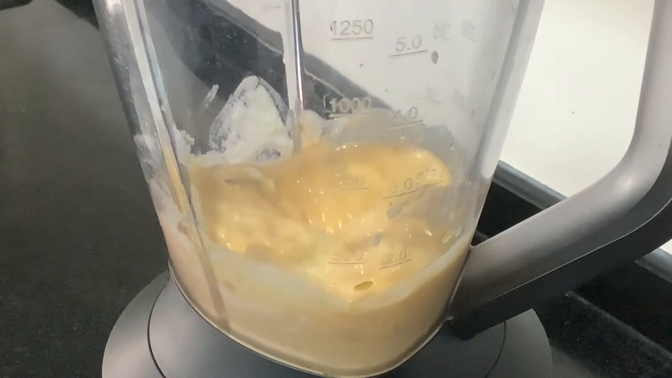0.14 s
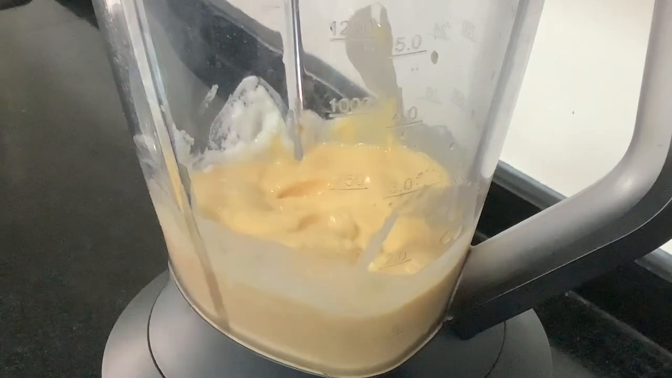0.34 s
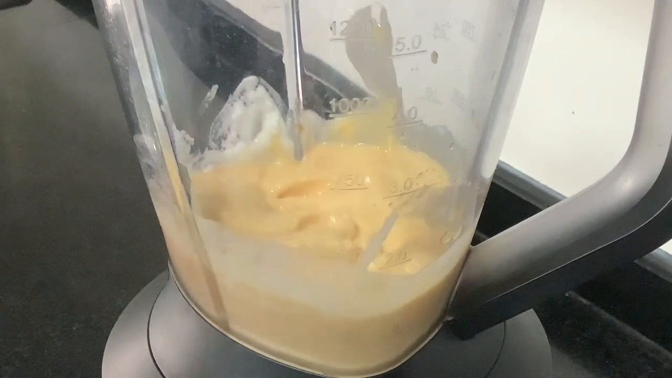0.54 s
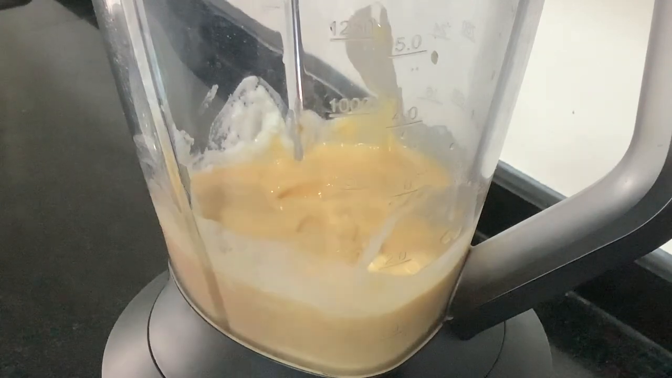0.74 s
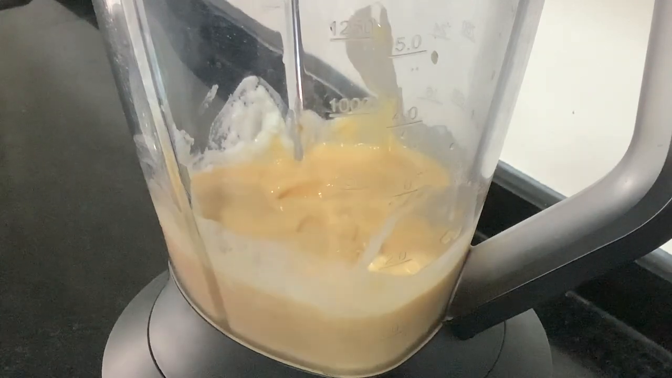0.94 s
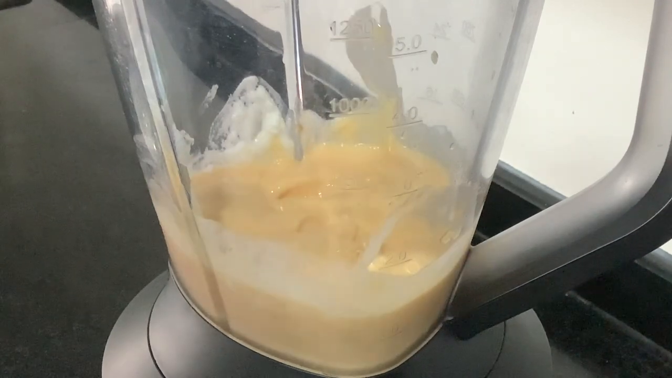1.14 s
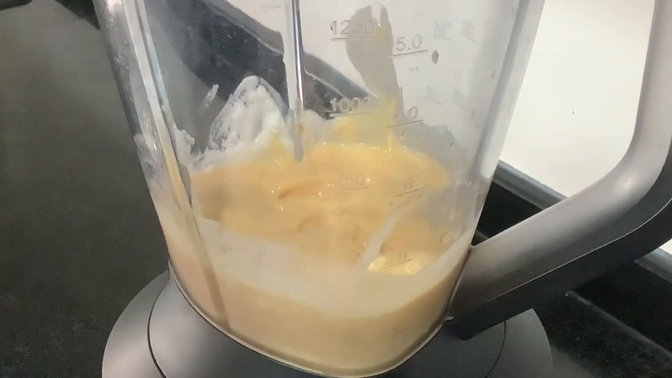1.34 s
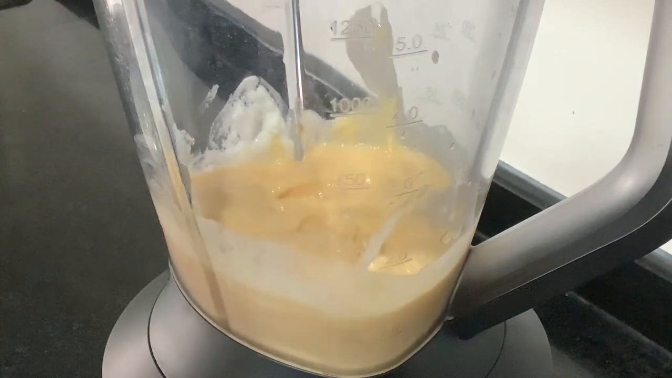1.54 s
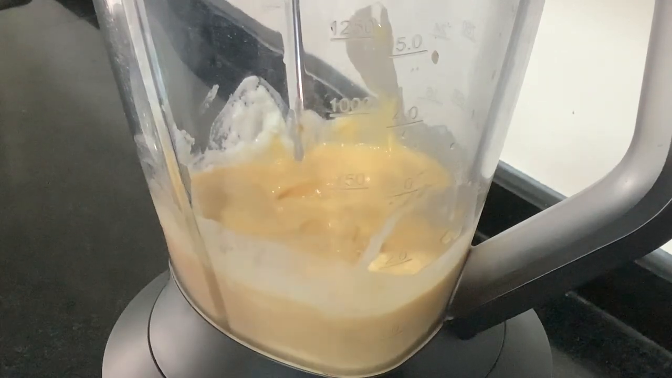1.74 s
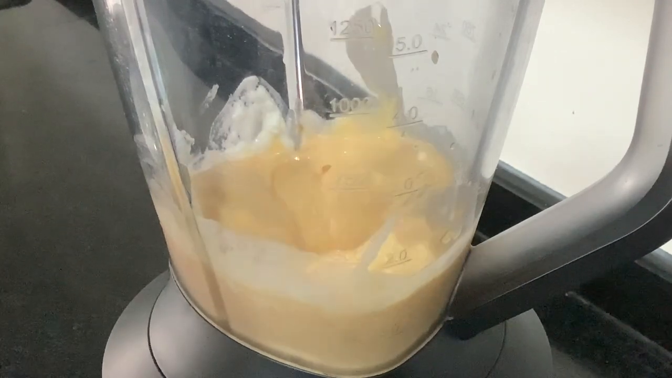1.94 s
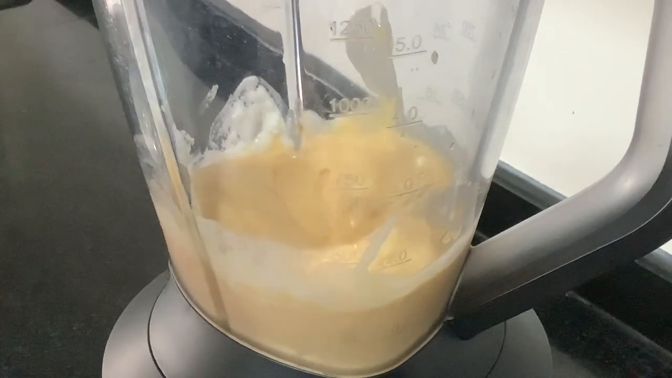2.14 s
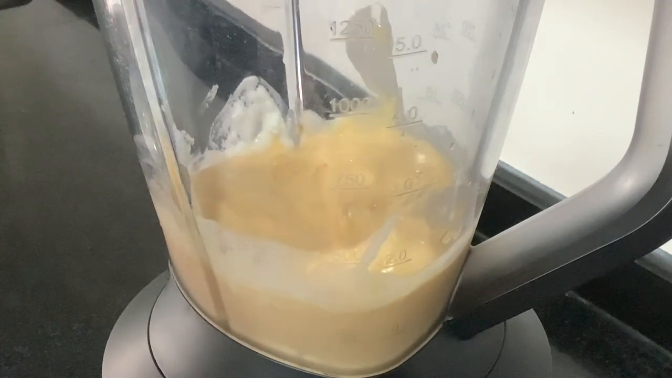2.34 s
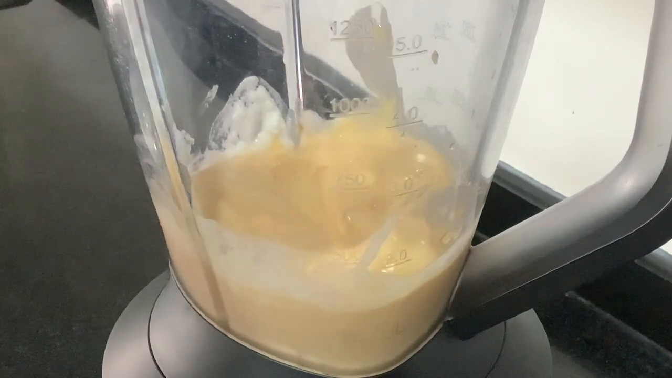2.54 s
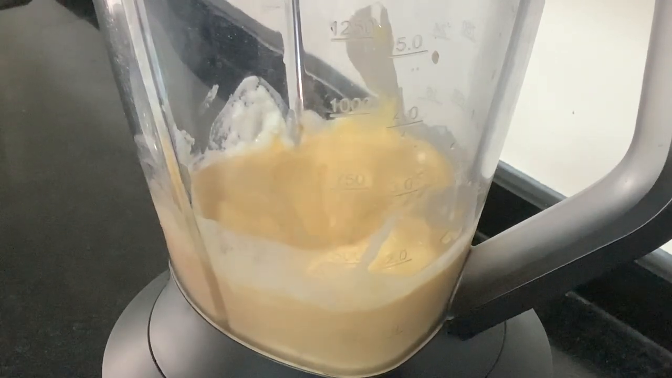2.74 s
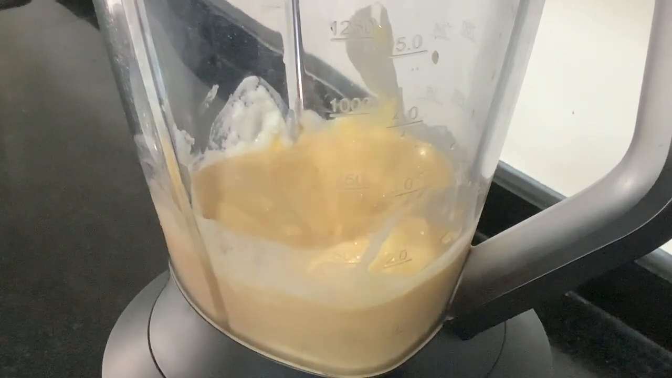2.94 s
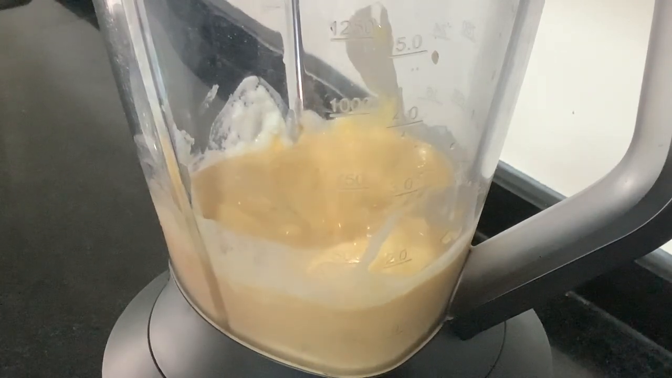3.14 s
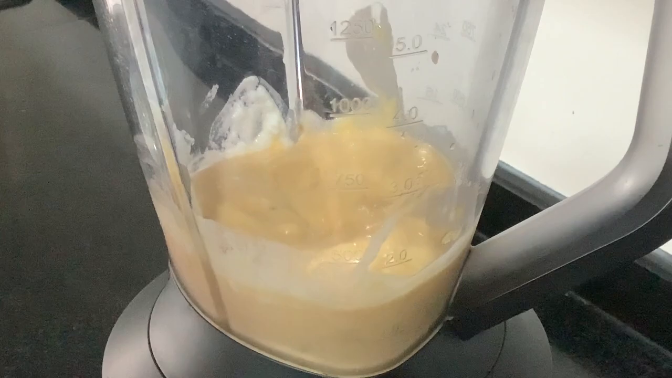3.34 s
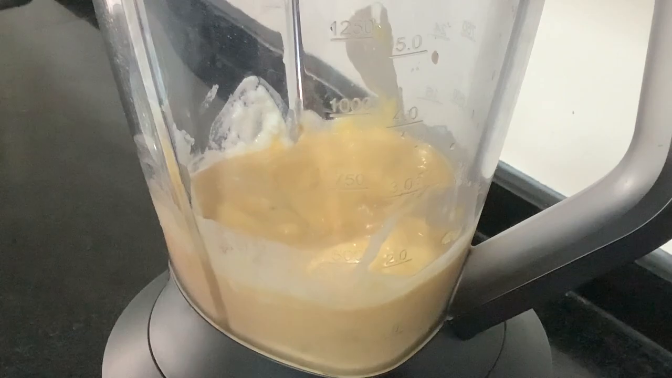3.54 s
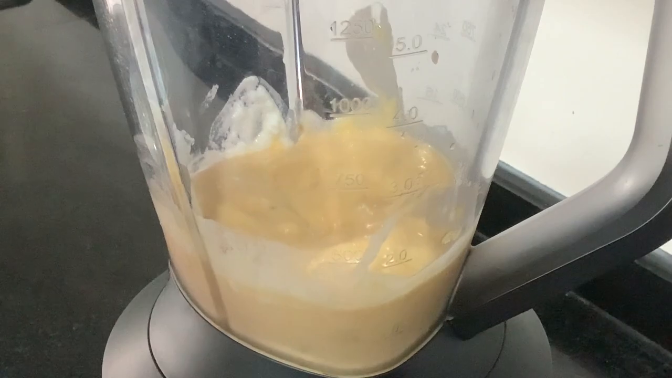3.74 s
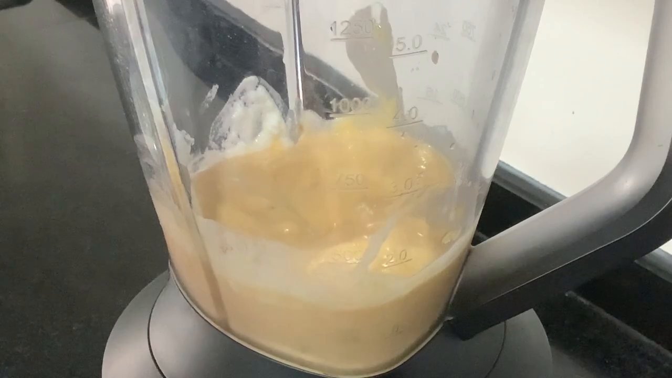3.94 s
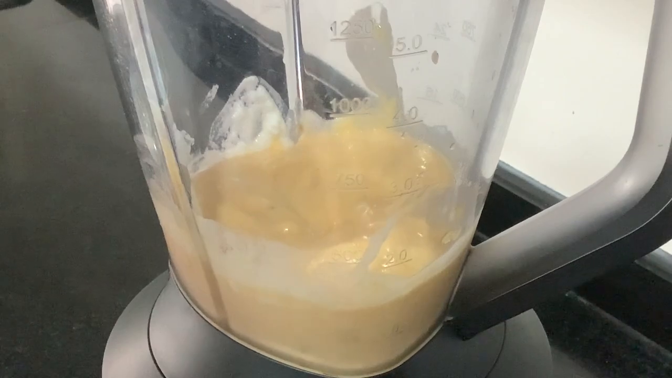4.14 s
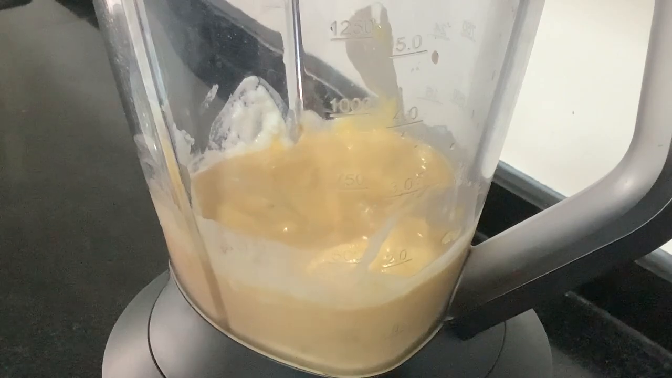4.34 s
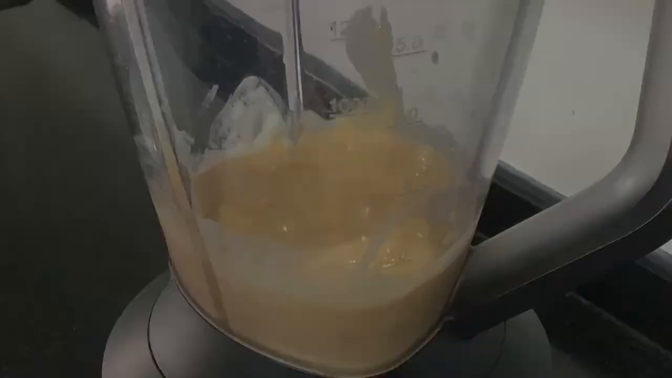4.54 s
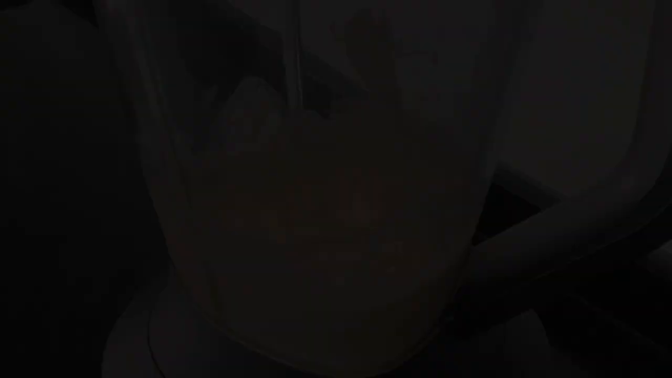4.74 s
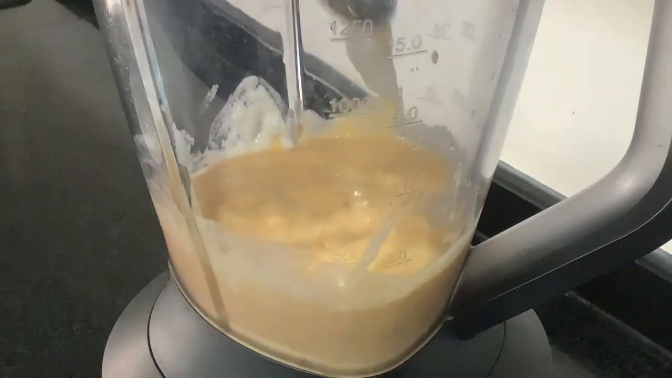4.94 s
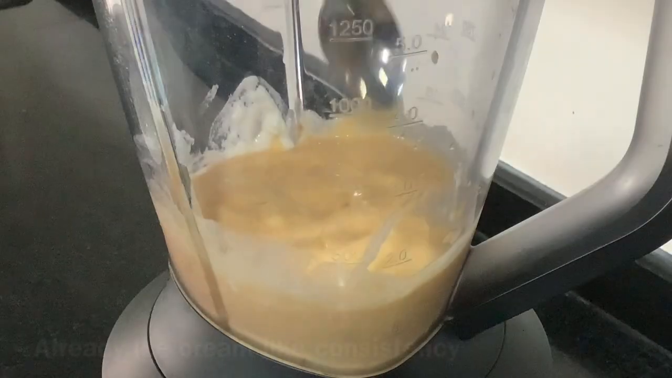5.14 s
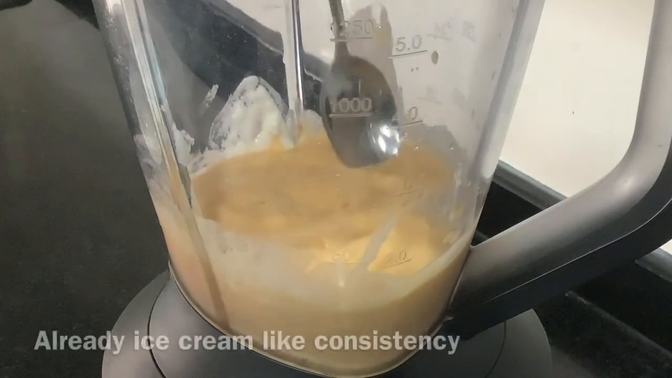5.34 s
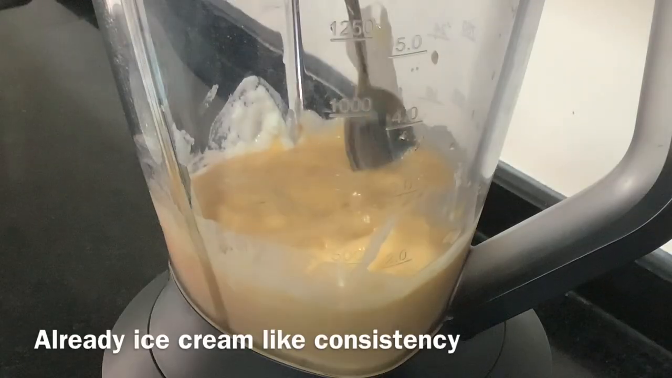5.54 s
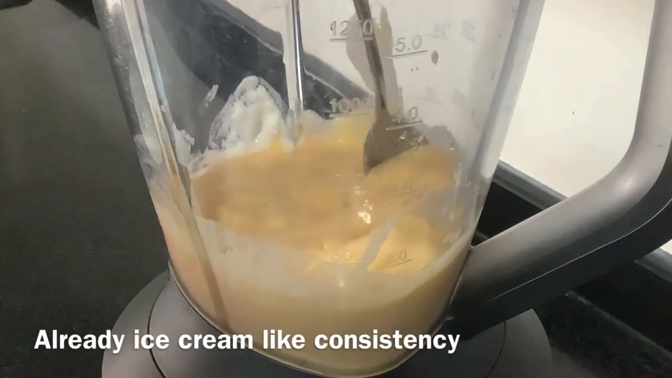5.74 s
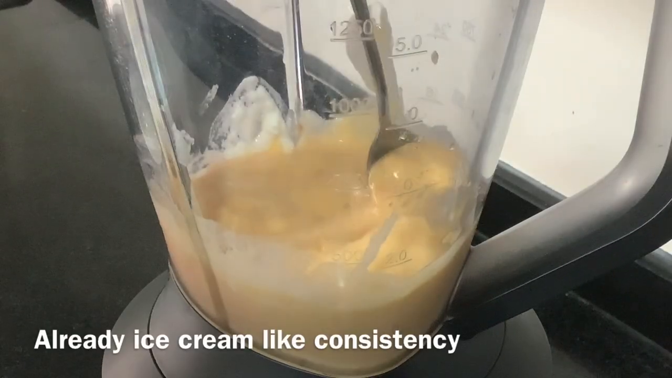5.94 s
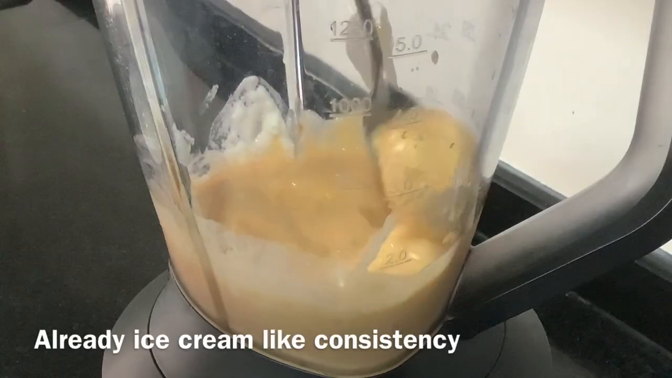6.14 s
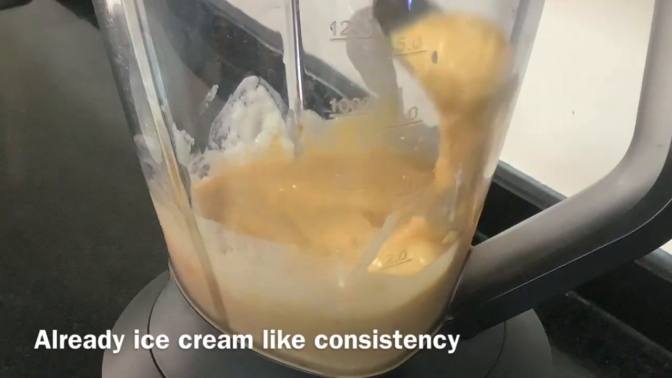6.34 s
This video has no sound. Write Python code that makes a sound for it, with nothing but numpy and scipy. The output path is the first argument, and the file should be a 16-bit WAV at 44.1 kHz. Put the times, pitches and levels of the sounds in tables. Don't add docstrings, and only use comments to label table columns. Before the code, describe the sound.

A close phone microphone hears a blender slowing, then a quiet gap with falling bird whistles and a thin trill. The motor clicks on, climbs fast with hard thuds and cracks, sags once as a lump jams, steadies with hiss and whine, then winds down. After an abrupt cut, a bird calls and a spoon clacks on the jar.

```python
import sys
import numpy as np
from scipy import signal
from scipy.fft import rfft, irfft
from scipy.io import wavfile
from scipy.ndimage import uniform_filter1d

SR = 44100
rng = np.random.default_rng(int(sys.argv[2]) if len(sys.argv) > 2 else 0)


def amplitude_ratio(level_db):
    exponent = np.asarray(level_db, float) / 20
    return 10 ** exponent


def pcm_store(signal):
    levels = np.round(np.clip(np.atleast_2d(signal), -1, 1) * 32767)
    wavfile.write(sys.argv[1], SR, levels.astype(np.int16).T)


N = 282240
T = np.arange(N) / SR
POWER_ON_S, POWER_OFF_S = 1.742, 4.0
CUTS_S = [.379, 4.712]
TOP_HZ = 15700


def unit(x):
    return x / np.sqrt(np.mean(x ** 2) + 1e-18)


def curve(table, edge=None):
    s, *columns = np.transpose(table)
    return [np.interp(T, s, c, edge, edge) for c in columns]


def colour(x, points):
    hz, db = np.transpose(points)
    log_hz = np.log(np.fft.rfftfreq(N, 1 / SR) + 1)
    return irfft(rfft(x) * amplitude_ratio(np.interp(log_hz, np.log(hz), db)), N)


def band(x, hz, width):
    return signal.lfilter(*signal.iirpeak(min(hz, .4 * SR), max(hz / width, .3), SR), x)


def band_twice(x, hz, width):
    return band(band(x, hz, width), hz, width)


def body(x, modes):
    return sum((-1) ** k * amplitude_ratio(db) * band(x, hz, width) for k, (hz, width, db) in enumerate(modes))


def walk(rate):
    k = int(SR / rate)
    return unit(uniform_filter1d(np.repeat(rng.standard_normal(N // k + 1), k), k)[:N])


def noise():
    return rng.standard_normal(N)


def burst(s, peak_db, hz, width, t60, rise=0.00015):
    t = np.clip(T - s, 0, 1)
    envelope = np.exp(-np.log(1000) * t / t60) * (1 - np.exp(-t / rise))
    puff = band_twice(noise(), hz, width) * envelope
    return puff * amplitude_ratio(peak_db) / np.abs(puff).max()


def echo(x, t60, wet_db, grain=0.):
    t = T[:SR // 2]
    tail = rng.standard_normal(len(t)) * np.exp(-np.log(1000) * t / t60) * (t > .004)
    wet = signal.fftconvolve(x, tail / np.sqrt(np.sum(tail ** 2)))[:N]
    return x + amplitude_ratio(wet_db) * wet * (1 - grain + grain * walk(350))


SMOOTH_SHARE, COAST_SHARE, START_SHARE, BREAKUP_S = .14, .72, .7, .5
JAM_S, JAM_SHARE, JAM_LENGTH_S = 2.806, 0.38, 0.11


def lumps():
    start = START_SHARE * np.exp(-((T - POWER_ON_S) / BREAKUP_S) ** 4)
    jam = JAM_SHARE * np.exp(-((T - JAM_S) / JAM_LENGTH_S) ** 2)
    return np.clip(np.where(T < CUTS_S[0], COAST_SHARE, SMOOTH_SHARE + start + jam), 0, 1)


def shaft_pulse(hz, turns):
    angle = 2 * np.pi * (turns % 1) + 1e-7
    every_multiple = np.sin((np.floor(2600 / hz) + .5) * angle) / (2 * np.sin(angle / 2)) - .5
    return (every_multiple - np.cos(angle) - np.cos(2 * angle)) * (hz / 150) ** 0.15


# centre in Hz, width in Hz, level in dB.
BASE_MODES = [(983, 18, -1.5), (1149, 230, -3), (1810, 61, -10.5), (2212, 28, -5.5), (2338, 70, -4),
              (3366, 290, -14.5), (4710, 170, -11)]
# frequency in Hz, level in dB per Hz.
CHURN_SPECTRUM = [(120, -48.5), (200, 0.5), (251, -20), (360, -5.5), (609, -17), (1190, -3.5),
                  (1530, -15.5), (2270, -7.5), (2530, -21.5), (3500, -24), (4550, -48), (7700, -120)]
KNOCK_DB, GUSH_DB, CHURN_DB = -.5, -7.5, -1.0
CHURN_COAST_DB = -1
RING_HZ, RING_WIDTH_HZ, RING_DB = 476.7, 15, -13


def rattle(hz, turns, pulse, ripple, share, gate, coasting):
    size = amplitude_ratio(2.2 * rng.standard_normal(2000))[np.floor(turns + .5).astype(int)]
    push = 1 + 0.82 * ripple + 1.2 * share * ripple ** 3
    knocks = np.sqrt(1 - share) * pulse * size * push
    out = amplitude_ratio(KNOCK_DB) * unit(body(knocks, BASE_MODES))
    out += amplitude_ratio(GUSH_DB) * unit(body(gate * noise(), BASE_MODES))
    out += amplitude_ratio(CHURN_DB + CHURN_COAST_DB * coasting) * unit(colour(gate * noise(), CHURN_SPECTRUM))
    out = signal.sosfilt(signal.butter(3, 720, "high", fs=SR, output="sos"), out)
    ring = band(band(noise(), RING_HZ, RING_WIDTH_HZ), RING_HZ, 2 * RING_WIDTH_HZ)
    return out + amplitude_ratio(RING_DB) * (hz / 190) ** 2 * unit(ring)


# frequency in Hz, level in dB per Hz.
COUNTER_SPECTRUM = [(30, -42), (55, -16), (80, 2), (120, -5), (200, -5), (300, -22.5), (600, -73.5)]


def counter_rumble(hz):
    return np.sqrt(hz / 170) * amplitude_ratio(-19.5 + 2.1 * walk(13)) * unit(colour(noise(), COUNTER_SPECTRUM))


# centre in Hz, width in Hz, level in dB.
JAR_MODES = [(231, 170, -2), (353, 35, 4), (458.4, 6.4, 4.5), (582, 63, -5), (707, 80, -5)]
# centre in Hz, width in Hz, level in dB.
LUMP_MODES = [(350, 86, 0), (468, 16, 3), (672, 210, -6)]


def jar_boom(pulse, ripple, share):
    regular = unit(body(pulse * (1 + .5 * ripple), JAR_MODES))
    tumbling = unit(body(noise() * amplitude_ratio(1.5 * walk(30)), LUMP_MODES))
    return np.sqrt(1 - share) * regular + np.sqrt(share) * tumbling


# frequency in Hz, level in dB per Hz.
HISS_SPECTRUM = [(1530, -22.5), (2600, 0), (3320, -2.5), (3800, -2), (4700, -2.5), (6000, -4.5),
                 (6430, -12.5), (8840, -11.5), (10900, -14), (13300, -18), (16000, -20.5)]
WHINE_LEVELS = [-18, -14.5, -12.5, -17, -14]
BARS = 24
STEADY_S, STEADY_RISE_S = 2.98, .06
WHINE_LOADED_DB, WHINE_CLEAR_DB, WHINE_COAST_DB_PER_S = -15, -3.5, -8


def hiss_and_whine(hz, turns, gate, coasting):
    out = unit(colour(noise() * (1 + gate) * amplitude_ratio(1.6 * walk(45)), HISS_SPECTRUM))
    cleared = 1 / (1 + np.exp((STEADY_S - T) / STEADY_RISE_S))
    clear_db = WHINE_LOADED_DB + (WHINE_CLEAR_DB - WHINE_LOADED_DB) * cleared
    clear_db = clear_db + WHINE_COAST_DB_PER_S * coasting
    for k, db in enumerate(WHINE_LEVELS):
        order = BARS * (k + 1)
        tone = np.sin(2 * np.pi * order * turns + 1.2 * walk(150)) * (order * hz < TOP_HZ)
        out += amplitude_ratio(db + clear_db - 1 + 3 * walk(30)) * tone
    return out


# centre in Hz, width in Hz, level in dB.
SHELL_MODES = [(100, 25, -29), (190.86, 39, -25.5), (230, 20, -26.5), (304.6, 45, -24.5), (349.4, 35, -16),
               (446, 60, -21.5), (947.2, 33, -24.5)]


def shell_db(hz):
    power = sum(amplitude_ratio(db) ** 2 / (1 + (2 * (hz - f) / width) ** 2) ** 2 for f, width, db in SHELL_MODES)
    return 10 * np.log10(power + amplitude_ratio(-50.5) ** 2)


# multiple of the shaft rate, level in dB.
SINGING_ORDERS = [(4, -20.5), (5, 3), (6, -11)]
SECOND_DB, UNPOWERED_DB = -1.0, -3
BLADE_DB, BLADE_CLEAR_S = 0, .35


def shaft_tones(hz, turns, ripple, share, coasting):
    first_db = shell_db(hz) + UNPOWERED_DB * np.clip(4 * coasting, 0, 1) + 0.5 * walk(11)
    out = amplitude_ratio(first_db) / np.sqrt(1.01 - share) * np.sin(2 * np.pi * turns) * (1 + 0.37 * ripple)
    second_db = shell_db(2 * hz) + SECOND_DB + 2.0 * walk(15)
    out += amplitude_ratio(second_db) * np.sin(4 * np.pi * turns) * (1 + 0.23 * ripple)
    for k, db in SINGING_ORDERS:
        audible = np.clip((k * hz - 520) / 200, 0, 1)
        out += amplitude_ratio(shell_db(5 * hz) + db + walk(15)) * audible * np.cos(2 * np.pi * round(k) * turns)
    idling = np.clip(coasting / BLADE_CLEAR_S, 0, 1) ** 2
    return out + amplitude_ratio(shell_db(4 * hz) + BLADE_DB) * idling * np.sin(8 * np.pi * turns)


# time in seconds, shaft turns in Hz, level in dB.
RUN_DOWN = [(0.0, 56.1, -23.5), (0.126, 42.92, -27.5), (0.212, 35.62, -28), (0.292, 29.5, -34),
            (0.364, 25.4, -44.5)]
# time in seconds, shaft turns in Hz, level in dB.
FULL_BURST = [(1.74, 27.12, -30), (1.8, 43.1, -33), (1.85, 57.26, -22.5), (1.95, 83.55, -19.5),
              (2.1, 111.4, -16), (2.22, 120, -15.5), (2.28, 130.6, -18), (2.4, 149.6, -12.5),
              (2.71, 168.8, -13.5), (2.83, 150.8, -14.5), (3.17, 175.4, -15.5), (3.5, 186.4, -15),
              (3.99, 190.1, -15), (4.25, 142.8, -15), (4.4, 117.6, -18), (4.58, 86.46, -22),
              (4.7, 71.47, -23)]
RIPPLE_HZ = 100.
BOOM_DB, BOOM_LUMP_DB, HISS_DB, HISS_LUMP_DB, HISS_COAST_DB = -9, 4, -11, 8, -4
GULP_S, GULP_LENGTH_S, GULP_DB = 4.31, 0.026, -15.5


def motor():
    hz, level_db = curve(RUN_DOWN + FULL_BURST)
    running = (T < CUTS_S[0]) | (T > FULL_BURST[0][0])
    share, coasting = lumps(), np.clip(T - POWER_OFF_S, 0, 1)
    turns = np.cumsum(hz * (1 + .0025 * walk(40))) / SR
    powered = (T > POWER_ON_S) & (T < POWER_OFF_S)
    ripple = np.cos(2 * np.pi * RIPPLE_HZ * T) * powered
    pulse = shaft_pulse(hz, turns)
    gate = np.sqrt(1.5 + 0.82 * share) * (0.73 + np.exp(-(turns % 1) / 0.64)) * (1 + 0.1 * ripple)
    gulp = amplitude_ratio(GULP_DB * np.exp(-((T - GULP_S) / GULP_LENGTH_S) ** 2))
    boom_db = BOOM_DB + BOOM_LUMP_DB * share
    hiss_db = HISS_DB + np.where(T < 1, 0, HISS_LUMP_DB * share) + HISS_COAST_DB * coasting
    shaking = rattle(hz, turns, pulse, ripple, share, gate, coasting) + counter_rumble(hz)
    out = amplitude_ratio(level_db - 1.92) * shaking
    out += amplitude_ratio(level_db + boom_db + 3.5) * jar_boom(pulse, ripple, share) * gulp
    out += amplitude_ratio(level_db + hiss_db - 0.52) * hiss_and_whine(hz, turns, gate, coasting)
    tones = shaft_tones(hz, turns, ripple, share, coasting) * gulp
    out += np.sqrt(2 * (1 - share)) * amplitude_ratio((level_db + 15.5) * 0.81) * tones
    return running * out


# frequency in Hz, level in dB per Hz.
ROOM_SPECTRUM = [(18, -42.5), (30, -21), (85, -0.5), (173, -4), (225, -7.5), (284, -13.5), (359, -13.5),
                 (505, -17.5), (852, -21), (996, -24), (1360, -28), (1870, -32), (2760, -34), (3150, -40),
                 (15500, -51.5)]
ROOM_DB, ROOM_LATE_DB = -46.5, -47.5


def kitchen():
    floor = colour(noise(), ROOM_SPECTRUM)
    bass = band(floor, 120, 200)
    fluttering = unit(floor + bass * (amplitude_ratio(2.8 * walk(10)) - 1))
    return fluttering * amplitude_ratio(np.where(T < POWER_ON_S, ROOM_DB, ROOM_LATE_DB))


def whistle(s, length, hz, db, waver=1):
    on = (T > s) & (T < s + length)
    level = uniform_filter1d(on * amplitude_ratio(db + waver * 1.7 * walk(70)), 300)
    phase = 2 * np.pi * np.cumsum(hz * (1 + waver * 0.011 * walk(90))) / SR
    return level * np.sqrt(2) * np.sin(phase)


# start in seconds, length in seconds, first pitch in Hz, hold as a share, peak in dB.
FALLING_WHISTLES = [(0.507, 0.086, 2243, 0.37, -46), (.785, 0.19, 2350, 0.34, -46.5),
                    (1.079, 0.17, 2500, 0.021, -46)]
FALL_END_HZ, LOUD_SHARE, FALL_START_DB, FALL_END_DB = 1630, 0.84, -14, -20
GLIDE_BEND = 0.052


def falling_whistles():
    out = 0
    for s, length, first, hold, db in FALLING_WHISTLES:
        u = (T - s) / length
        slide = np.clip((u - hold) / (1 - hold), 0, 1)
        bent = u + GLIDE_BEND * np.sin(2 * np.pi * slide)
        hz = np.interp(bent, [hold, 1], [first, FALL_END_HZ])
        swell_db = np.interp(u, [0, LOUD_SHARE, 1], [FALL_START_DB, 0, FALL_END_DB])
        out = out + whistle(s, length, hz, db + swell_db)
    return out


# start in seconds, peak in dB, pitch near mid-note in Hz.
TRILL_NOTES = [(1.3565, -53, 2960), (1.392, -53, 3630), (1.4366, -56, 3850), (1.475, -61, 4040),
               (1.5094, -64, 4100), (1.5474, -60, 3590)]


def trill():
    out, breath = 0, walk(1500)
    for s, db, hz in TRILL_NOTES:
        u = np.clip((T - s) / 0.032, 0, 1)
        phase = 2 * np.pi * np.cumsum(hz * (.72 + .5 * u)) / SR
        out = out + amplitude_ratio(db) * np.sin(np.pi * u) * (.1 + breath) * np.sin(phase)
    return out


def rasp():
    swell = np.exp(-((T - 1.47) / 0.075) ** 2) * amplitude_ratio(3 * walk(40.8))
    out = amplitude_ratio(-63.0) * unit(band_twice(noise(), 3400, 1500))
    out += amplitude_ratio(-69.0) * unit(band(noise(), 6750, 250)) + amplitude_ratio(-77) * unit(band(noise(), 8100, 150))
    return swell * out


# start in seconds, length in seconds, top and last pitch in Hz, peak in dB.
ARCHED_WHISTLES = [(5.645, .205, 1965, 1740, -43), (6.335, .055, 2260, 1850, -52)]
ARCH_TOP_SHARE, ARCH_RISE, ARCH_EDGE_DB = .42, .085, -13


def arched_whistles():
    out = 0
    for s, length, top, last, db in ARCHED_WHISTLES:
        u = np.clip((T - s) / length, 0, 1)
        before = np.clip(1 - u / ARCH_TOP_SHARE, 0, 1)
        after = np.clip((u - ARCH_TOP_SHARE) / (1 - ARCH_TOP_SHARE), 0, 1)
        hz = top * (1 - ARCH_RISE * before ** 2) + (last - top) * after ** 2.4
        out = out + whistle(s, length, hz, db + ARCH_EDGE_DB * (2 * u - 1.1) ** 4, waver=.3)
    return out


# start in seconds, peak in dB, centre in Hz, width in Hz.
FAR_PEEPS = [(0.868, -51, 2550, 500), (.9, -53, 2500, 600), (.97, -60, 6900, 90), (1.16, -50, 2590, 500),
             (1.19, -51, 2580, 500), (1.23, -55, 1270, 100)]
# start in seconds, length in seconds, first and last pitch in Hz, level in dB.
SHORT_GLIDES = [(5.99, .03, 3200, 2250, -62), (6.05, .022, 2450, 2760, -54), (6.072, .09, 2750, 2270, -51),
                (6.25, .085, 2550, 3250, -61), (6.29, .045, 5400, 6000, -66)]


def birds():
    out = falling_whistles() + trill() + rasp() + arched_whistles()
    for s, db, hz, width in FAR_PEEPS:
        out = out + burst(s, db, hz, width, 0.12, rise=.003)
    for s, length, first, last, db in SHORT_GLIDES:
        out = out + whistle(s, length, np.interp(T, [s, s + length], [first, last]), db)
    return echo(out, t60=.62, wet_db=-4, grain=.42)


# start in seconds, peak in dB, centre in Hz.
SMALL_TICKS = [(0.6818, -48, 5300), (0.7851, -46, 10700), (0.9433, -54, 9320), (5.8563, -58, 3590),
               (6.0601, -52, 4500)]
# start in seconds, peak in dB, crack in dB against it, ring in seconds, centre in Hz.
SPOON_TAPS = [
    (5.941, -23, -29, 0.086, 920),
    (6.199, -7.5, -18, 0.053, 1270),
]
# centre in Hz, width in Hz, level in dB.
TAP_RESONANCES = [(507, 90, 5), (950, 390, -1.5), (1270, 110, 1), (1810, 810, -0.5), (2350, 1500, -1),
                  (3440, 930, -4.5), (5300, 870, -5.5)]
DRAG_S, DRAG_RISE_S, DRAG_DB = 6.107, 0.08, -59.5
SQUELCH_DB, SLUMP_DB_PER_S = 13.5, -70
SPLASH_DB, SPLASH_T60_S = -22, 0.35


def spoon():
    out = sum(burst(s, db, hz, 0.25 * hz, 0.026) for s, db, hz in SMALL_TICKS)
    slop = 0
    for s, db, crack_db, ring, hz in SPOON_TAPS:
        strike = burst(s, 0, hz, 2.0 * hz, max(ring, .004)) + burst(s, 2.3, 2.05 * hz, 3 * hz, 0.018)
        clack = body(strike, TAP_RESONANCES)
        out = out + amplitude_ratio(db - 4.5) * clack / np.abs(clack).max()
        out = out + burst(s, db + crack_db, 4200, 7700, 0.028)
        slop = slop + burst(s, db + SPLASH_DB, 1400, 3000, SPLASH_T60_S, rise=.004)
    drag_db = DRAG_DB + SLUMP_DB_PER_S * np.clip(T - SPOON_TAPS[-1][0], 0, 1)
    build_up = (T > DRAG_S) * np.clip(.5 + .5 * (T - DRAG_S) / DRAG_RISE_S, 0, 1)
    grain = build_up * amplitude_ratio(drag_db + 1.7 * walk(90))
    scrape = amplitude_ratio(-2.0) * unit(band(noise(), 4000, 7000))
    squelch = amplitude_ratio(SQUELCH_DB + 2.5) * unit(band(noise(), 640, 600))
    return echo(out, t60=.45, wet_db=-7, grain=.5) + grain * (scrape + squelch) + slop


# start in seconds, peak in dB, centre in Hz.
SWITCH_CLICKS = [
    (1.724, -20.5, 11400),
    (1.743, -15.5, 342),
]


def switch():
    return sum(burst(s, db, hz, 1.7 * hz, 0.08, rise=0.00042) for s, db, hz in SWITCH_CLICKS)


# start in seconds, peak in dB, crack in dB against it, centre in Hz, ring in seconds.
CHUNK_HITS = [(1.853, -4, -21.5, 479.4, 0.74), (1.934, -17.5, 1.5, 443, 0.13), (1.999, -7, -6, 600, 0.32),
              (2.042, -5.5, -0.5, 620, 0.081), (2.172, -3, -4.5, 477.5, 0.073), (2.195, -2, -6, 470, 0.14),
              (2.489, -7, -7, 461.7, 0.06), (2.54, -14.5, -14, 330, 0.11), (2.777, 0.5, -7, 562.8, 0.055),
              (2.794, -1, -12, 352.4, 0.1), (2.937, -9, -26, 324.7, 0.12)]
# start in seconds, peak in dB, centre in Hz.
JAR_THUMPS = [(1.999, -34, 86.1), (2.529, -26, 110), (2.739, -21.5, 121), (2.899, -19, 78.1),
              (2.939, -18.5, 80.7)]


def chunks():
    out = sum(burst(s, db, hz, .5 * hz, 0.1, rise=0.007) for s, db, hz in JAR_THUMPS)
    for s, db, crack_db, hz, ring in CHUNK_HITS:
        out = out + burst(s, db - 4.0, hz, 0.27 * hz, max(ring, .01), rise=0.011)
        out = out + burst(s, db + crack_db - 3, 6500, 12000, 0.075, rise=0.0012)
    return out


def fades():
    out = [np.clip((s - T) / .025, 0, 1) for s in CUTS_S]
    back = [np.clip((T - s) / .04, 0, 1) for s in CUTS_S]
    return np.where(T < 1, out[0], out[1]), (out[0] + back[0]) * (out[1] + back[1])


def scene():
    shot, room = fades()
    blender = echo(motor() + chunks() + switch(), t60=.25, wet_db=-14) * shot
    return (blender + birds() + spoon() + kitchen() * (0.05 + 0.97 * room))[None]


def low_pass(x):
    return signal.sosfilt(signal.butter(12, 16370, fs=SR, output="sos"), x)


def record(dry):
    rounded = 1.12 * np.tanh(.95 * dry)
    x = signal.sosfilt(signal.butter(3, 52, "high", fs=SR, output="sos"), rounded)
    x = signal.sosfilt(signal.ellip(10, .2, 60, TOP_HZ, fs=SR, output="sos"), x)
    return low_pass(x)


dry = scene()
out = record(dry)
pcm_store(out)
```